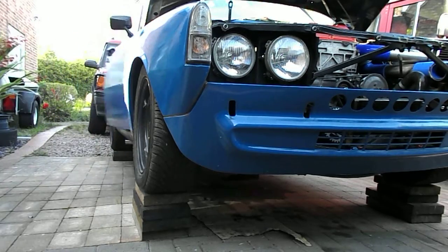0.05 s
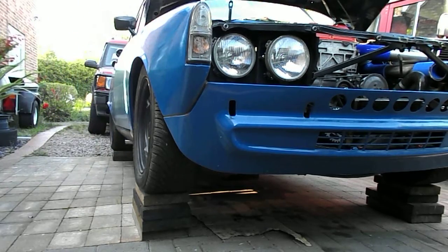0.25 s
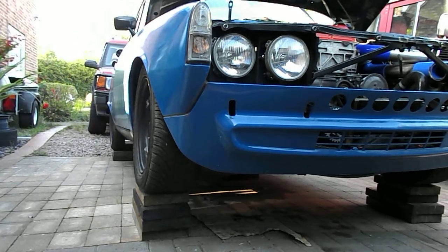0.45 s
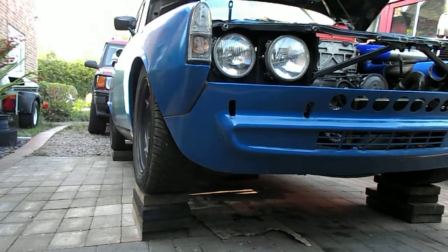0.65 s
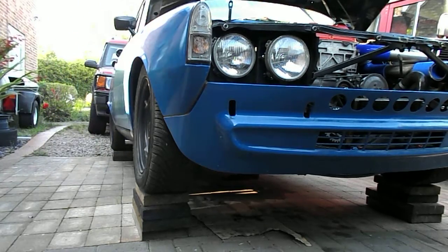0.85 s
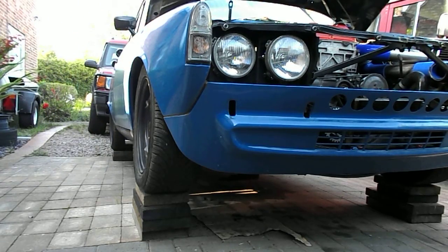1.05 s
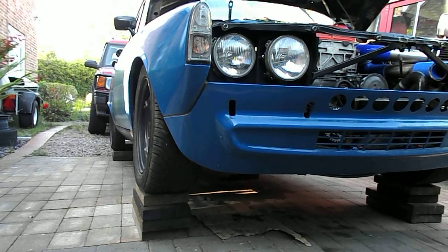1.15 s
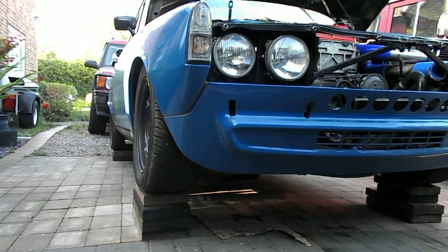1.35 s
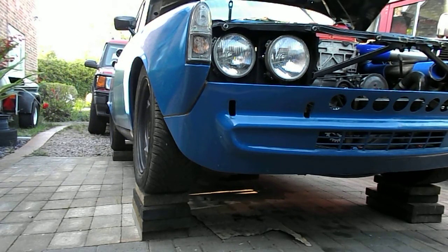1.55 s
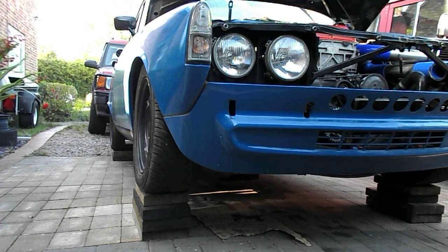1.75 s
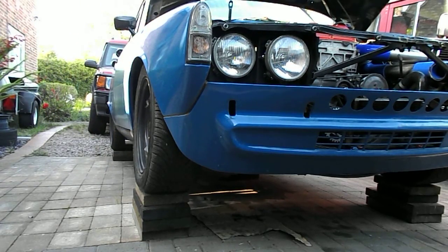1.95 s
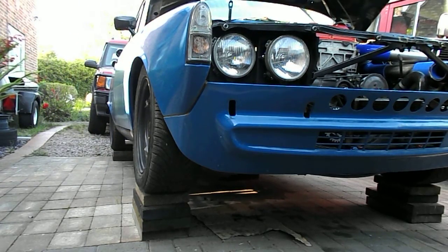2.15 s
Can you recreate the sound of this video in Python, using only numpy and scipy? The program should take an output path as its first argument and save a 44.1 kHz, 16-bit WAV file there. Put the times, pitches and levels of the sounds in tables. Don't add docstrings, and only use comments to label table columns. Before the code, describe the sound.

A car door slams shut outdoors. Soft air hiss and a low distant engine drone come first; at about 0.2 s the latch clicks, then at 0.27 s a hard steel clack and hollow panel thump, dying quickly with a short yard echo. A tiny rattle follows at 0.4 s, dull knocks around 0.6, 0.8 and 1.2-1.3 s, and light scuffing ticks near 1.85 s, while the drone sinks in pitch. Dull treble.

```python
import sys
import numpy as np
from scipy import signal
from scipy.fft import rfft, irfft
from scipy.io import wavfile
from scipy.ndimage import uniform_filter1d

SR = 44100
rng = np.random.default_rng(int(sys.argv[2]) if len(sys.argv) > 2 else 0)


def boost_factor(decibels):
    exponent = np.asarray(decibels, float) / 20
    return 10 ** exponent


def wav_out(sig):
    wavfile.write(sys.argv[1], SR, np.round(np.clip(np.atleast_2d(sig).T, -1, 1) * 32767).astype(np.int16))


N = 97020


def read(points, hz):
    f, value = np.transpose(points)
    return np.interp(np.log(hz + 1), np.log(f + 1), value)


def unit_rms(x):
    return x / np.sqrt(np.mean(x ** 2) + 1e-20)


def colour(x, db_at):
    hz = np.fft.rfftfreq(2 * len(x), 1 / SR)
    return irfft(rfft(x, 2 * len(x)) * boost_factor(db_at(hz)))[:len(x)]


def add(mix, start_s, sound):
    part = mix[round(start_s * SR):][:len(sound)]
    part += sound[:len(part)]


def ring(modes, t):
    return sum(boost_factor(db - 60 * t / t60) * np.sin(2 * np.pi * hz * t) for hz, db, t60 in modes)


# pitch_hz, level_db (per Hz)
AIR_SPECTRUM = [(20, -15), (40, -10), (70, -8.5), (120, -8.5), (165, -5.5), (400, -17.5), (1000, -19.5),
                (2000, -25.5), (3800, -27.5), (12000, -38.5)]
# time_s, level_db
AIR_SWELL = [(0, 1.5), (.2, 0.3), (.5, 0), (1.2, 0.47), (1.8, 0), (2.2, -0.1)]


def air():
    level_db, patch_db = -47.5, 1
    frames, hz = N // 256 + 5, np.fft.rfftfreq(1024, 1 / SR)
    real, imaginary, patches = rng.standard_normal((frames, 513, 3)).T
    patches = uniform_filter1d(patches, size=14, axis=0)
    patches = unit_rms(uniform_filter1d(patches, size=10, axis=1))
    spectrum = (real + 1j * imaginary) * boost_factor(read(AIR_SPECTRUM, hz)[:, None] + patch_db * patches)
    hiss = unit_rms(signal.istft(spectrum, nperseg=1024, noverlap=768)[1][:N])
    swell_db = np.interp(np.arange(N) / SR, *np.transpose(AIR_SWELL))
    return boost_factor(level_db + swell_db) * hiss


# time_s, firing_hz, first_order_db, second_order_db, third_order_db
ENGINE = [(0, 87.8, -47, -49.5, -60), (.15, 87.9, -47, -46, -54), (.45, 88, -62, -61.5, -64.5),
          (0.648, 87.47, -54, -48.5, -56.5), (.95, 87.82, -45.5, -54, -59),
          (1.151, 85.65, -46.5, -54.5, -57), (1.33, 83.77, -40, -52, -55.5),
          (1.499, 82.56, -50, -47.5, -62.5), (1.721, 79.8, -55, -46.5, -59.5), (1.9, 77.5, -45.5, -51, -56),
          (2.05, 76.36, -47.5, -52, -57.5), (2.2, 76.2, -54, -49.5, -49)]
# time_s, pitch_hz, level_db
HUM = [(0, 59.3, -52), (.6, 60.87, -57), (1.2, 63.8, -56), (1.8, 63.5, -50.5), (2.2, 60.9, -56)]


def drone():
    waver = 0.011
    t = np.arange(N) / SR
    time_s, firing_hz, *orders_db = np.transpose(ENGINE)
    slow = uniform_filter1d(rng.standard_normal(N), size=2000)
    slow = unit_rms(uniform_filter1d(slow, size=2000))
    turns = np.cumsum(np.interp(t, time_s, firing_hz) * (1 + waver * slow)) / SR
    engine = sum(boost_factor(np.interp(t, time_s, db)) * np.sin(2 * np.pi * (k + 1) * turns + k)
                 for k, db in enumerate(orders_db))
    time_s, pitch_hz, level_db = np.transpose(HUM)
    hum_turns = np.cumsum(np.interp(t, time_s, pitch_hz)) / SR
    hum = boost_factor(np.interp(t, time_s, level_db)) * np.sin(2 * np.pi * hum_turns)
    return np.sqrt(2) * (engine + hum)


SCUFF_STARTS = [.3935, .64, .864, .872, .9, 1.77, 1.8, 1.84, 1.8412, 1.853, 1.858, 1.874, 1.887, 1.893]
# length_s, level_db, centre_hz, width_hz
SCUFF_SHAPES = [(0.02, -45, 2800, 760), (0.038, -55, 3300, 2600), (0.02, -48.5, 3340, 1800),
                (.04, -51, 3000, 1700), (0.011, -46.5, 1060, 1300), (0.18, -52.5, 2900, 4500),
                (0.2, -53.5, 820, 720), (0.17, -51.5, 2800, 1800), (0.0062, -38.5, 5240, 4900),
                (0.0049, -39.5, 6300, 2100), (0.015, -41, 4200, 5200), (0.0077, -40.5, 4200, 4000),
                (.006, -41, 4300, 5000), (0.0065, -42, 2400, 4700)]


def scuffs():
    out, t = np.zeros(N), np.arange(7000) / SR
    for start_s, (length_s, level_db, centre_hz, width_hz) in zip(SCUFF_STARTS, SCUFF_SHAPES):
        def resonance_db(f):
            peak = -10 * np.log10(1 + ((f - centre_hz) / width_hz * 2) ** 2)
            return peak - 10 * np.log10(1 + (.5 * centre_hz / (f + 1)) ** 6)
        grain_db = 2.4 * np.minimum(rng.exponential(1, len(t)), 4)
        grit = unit_rms(colour(rng.standard_normal(len(t)) * boost_factor(grain_db), resonance_db))
        stroke = np.sin(np.pi * np.minimum(t / length_s, 1) ** .5)
        add(out, start_s, boost_factor(level_db) * grit * stroke)
    return out


# start_s, level_db, pitch_hz, t60_s, snap (relative size, negative pulls inward)
KNOCKS = [(.1905, -35.5, 504, 0.016, 1.1), (.2215, -35.5, 1080, 0.19, .1), (.2360, -26, 5210, 0.021, 0.8),
          (.2645, -21, 1178, 0.074, -0.065), (0.2663, -20.5, 3250, 0.02, 0.9),
          (.2670, -22.5, 775, 0.094, .1), (.2755, -27.5, 1507, .04, -0.14), (0.625, -31, 506, 0.024, -1.03),
          (.7670, -33, 443, 0.017, 1.3), (1.1745, -36, 471, 0.059, -1.2),
          (1.1748, -37.5, 763, 0.037, -0.018), (1.1770, -32, 156, 0.071, 0.1),
          (1.1950, -39.5, 375, 0.046, 1.1), (1.2107, -42.5, 2300, 0.0095, 0.16),
          (1.2210, -41.5, 2120, 0.017, 0.43), (1.207, -43, 907, 0.062, 0.6),
          (1.3070, -30.5, 1263, 0.0065, 0.16), (1.3070, -36.5, 426, 0.018, 0.003),
          (1.6850, -45.5, 1530, 0.027, 0.61), (1.8897, -39, 2630, 0.024, -0.29),
          (1.891, -38, 450, 0.027, 0.12), (2.0830, -49, 2530, .02, 0.66)]


def knocks():
    tick_hz = 2300
    out, t = np.zeros(N), np.arange(4000) / SR
    u = 2 * np.pi * tick_hz * t
    pulse = signal.lfilter([.3], [1, -.7], u * (1 - .5 * u) * np.exp(-u))
    for start_s, level_db, hz, t60, snap in KNOCKS:
        modes = [(hz, 0, t60), (1.35 * hz, -3, 0.37 * t60),
                 (.72 * hz, -11, t60), (2.03 * hz, -8, 0.61 * t60)]
        add(out, start_s, np.sign(snap) * boost_factor(level_db) * (7 * abs(snap) * pulse + ring(modes, t)))
    return out


# start_s, level_db,
# pitch_hz, t60_s
PINGS = [(0.2202, -31, 3100, 0.03), (0.2204, -27.5, 4010, 0.03), (.2222, -28, 3500, 0.038),
         (.2260, -33.5, 2300, 0.25), (.2310, -32.5, 811, 0.13), (.2362, -27, 4760, 0.037),
         (.2400, -26, 301, 0.079), (.2410, -30, 4220, 0.026), (0.2655, -18, 11150, 0.01),
         (0.267, -11, 3280, 0.0043), (0.275, -22.5, 1075, 0.057), (.2650, -21.5, 4830, 0.023),
         (.2690, -23, 3610, 0.028), (.2720, -26, 2320, 0.049), (0.2746, -16.5, 4320, 0.02),
         (0.278, -22, 4680, 0.023), (0.2842, -24, 2950, 0.048), (.2850, -24.5, 3674, 0.093),
         (.2880, -27.5, 3264, 0.055), (.2965, -33, 3600, 0.027), (0.306, -42, 2500, 0.039),
         (.3180, -35, 3304, 0.069), (.3220, -23, 137, 0.18), (0.347, -31, 86, 0.13),
         (.3260, -32.5, 643, 0.11), (.3945, -37, 2350, 0.017), (.4000, -35, 3800, 0.014),
         (0.404, -31.5, 3400, .01), (0.41, -45, 3740, 0.064), (0.419, -36.5, 147, 0.19),
         (0.6245, -40, 3240, 0.0093), (.6250, -33.5, 980, 0.021), (.6510, -41, 3500, .008),
         (0.767, -42, 4040, .012), (1.1900, -47.5, 953, .1), (1.2100, -50, 2590, .03),
         (1.3072, -43, 910, 0.025), (1.8425, -40, 5900, 0.0085), (1.841, -38, 3270, .004),
         (1.8444, -34, 1000, 0.016), (1.8613, -42.5, 2150, 0.034), (1.8647, -33, 3640, .006),
         (1.8675, -38, 4530, .02), (1.8759, -37, 4500, .006), (1.887, -34, 9150, .01),
         (1.8880, -33, 7800, .01), (1.8907, -29, 3030, .004), (1.8915, -30, 2250, .012),
         (1.8940, -38, 2860, .025), (1.9075, -48, 3520, .015)]


def pings():
    rise_s = 0.00038
    out, t = np.zeros(N), np.arange(6000) / SR
    for start_s, level_db, pitch_hz, t60_s in PINGS:
        add(out, start_s, np.minimum(t / rise_s, 1) * ring([(pitch_hz, level_db, t60_s)], t))
    return out


# start_s, level_db, bass_db (below 200 Hz)
THUDS = [
    (0.232, -32, -10),
    (0.266, -19, -28),
    (0.2918, -21.5, 1),
    (0.3010, -26.5, 5),
    (0.319, -42.5, 4),
    (.345, -37, -12),
]
# pitch_hz, level_db, t60_s
PANEL_MODES = [(77, -20, 0.17), (113.8, -1.5, 0.12), (135, -21, 0.1), (162, 1, 0.26), (224.5, -10.5, 0.28),
               (311.3, -10, 0.26), (420, -7, 0.089), (535, -13, 0.25), (190.2, -18, 0.18),
               (785, -14, 0.095), (1120, -22, .1), (1137, -10, 0.3)]


def panel():
    push_s, rumble_db, rumble_hz, rumble_t60_s = 0.001, -2.5, 600, 0.19
    out, t = np.zeros(N), np.arange(22000) / SR
    push = np.sin(np.pi * np.minimum(t[:800] / push_s, 1))
    push = push / push.sum()

    def rumble_band_db(f):
        return -10 * np.log10(1 + (f / rumble_hz) ** 4) - 10 * np.log10(1 + (220 / (f + 1)) ** 4)

    for start_s, level_db, bass_db in THUDS:
        uneven_db = .5 * rng.standard_normal(len(PANEL_MODES))
        modes = [(hz, db + extra + bass_db * (hz < 200), t60)
                 for (hz, db, t60), extra in zip(PANEL_MODES, uneven_db)]
        boom = signal.oaconvolve(ring(modes, t), push)[:len(t)]
        rumble = unit_rms(colour(rng.standard_normal(len(t)), rumble_band_db))
        rumble = rumble * np.minimum(t / 0.014, 1) * boost_factor(rumble_db - 60 * t / rumble_t60_s)
        add(out, start_s, -boost_factor(level_db) * (boom + rumble))
    return out


# start_s, level_db, t60_s, tilt_db (per octave)
BLOWS = [
    (0.2197, -27, 0.28, 1.5),
    (0.2361, -25.5, 0.029, -1),
    (.2640, -16.5, 0.059, -1.5),
    (.2700, -22.5, 0.093, -5.5),
    (.2760, -35, 0.28, -4.5),
    (0.2844, -23, 0.078, 0),
    (.2930, -27.5, 0.12, -2.5),
    (0.3959, -42.5, 0.11, -2),
    (.4000, -46, 0.11, 3.5),
]
# pitch_hz, level_db
LATCH_MODES = [(790, -2), (1100, 4.5), (1450, -3.5), (2400, -8), (2900, -3), (3500, -7), (4000, 0.5),
               (4600, -5)]
# pitch_hz, level_db
STEEL = [(120, -14), (300, -21), (800, -18), (1450, 3.5), (3700, 4), (6000, -1), (12000, -10.5)]


def latch():
    ring_t60_s, ring_db, rise_s = .02, -6, .001
    clicks_per_s, spread_db = 7000, 1.8
    out, t = np.zeros(N), np.arange(12000) / SR
    bell = ring([(hz, db, ring_t60_s) for hz, db in LATCH_MODES], t[:4000])
    for start_s, level_db, t60_s, tilt_db in BLOWS:
        def steel_db(f):
            return read(STEEL, f) + tilt_db * np.log2((f + 50) / 2000)
        clicks = (rng.random(len(t)) < clicks_per_s / SR) * rng.standard_normal(len(t))
        clicks = clicks * boost_factor(spread_db * rng.exponential(1, len(t)))
        decay = boost_factor(-60 * t / t60_s) + 0.56 * boost_factor(-60 * t / 0.02)
        shape = np.minimum(t / rise_s, 1) * boost_factor(level_db) * decay
        clatter = unit_rms(colour(clicks + 0.64 * rng.standard_normal(len(t)), steel_db))
        bell_rms = np.sqrt(np.mean(signal.oaconvolve(clicks, bell) ** 2))
        ringing = signal.oaconvolve(shape * clicks, bell)[:len(t)] / bell_rms
        add(out, start_s, shape * clatter + boost_factor(ring_db) * ringing)
    return out


# pitch_hz, t60_s
YARD_DECAY = [(100, 0.31), (500, 0.3), (2000, 0.16), (6000, 0.2)]


def yard(x):
    taps = np.zeros(SR // 2)
    at = np.arange(300, len(taps) - 20, 20)
    taps[at + rng.integers(0, 20, len(at))] = rng.choice([-1., 1.], len(at))
    hz, t, z = signal.stft(taps, SR, nperseg=256)
    dying = z * boost_factor(-60 * t / read(YARD_DECAY, hz)[:, None])
    tail = signal.istft(dying, SR, nperseg=256)[1]
    return signal.fftconvolve(x, tail / np.linalg.norm(tail))[:N]


def scene():
    low_cut_hz, yard_db = 79, -10.5
    door = latch() + panel() + knocks() + pings() + scuffs()
    near = signal.lfilter(*signal.butter(2, low_cut_hz, "high", fs=SR), door)
    return (near + boost_factor(yard_db) * yard(near) + drone() + air())[None]


# pitch_hz, level_db
TREBLE = [(4000, -0.33), (5000, -2), (5800, -3.5), (6600, -10.5), (7700, -12), (9200, -13), (10800, -7),
          (11500, -16.5)]
GAPS_HZ = (7000, 8500, 10000)


def treble_response(x):
    gap_width_hz, edge_hz = 450, 11580

    def response_db(f):
        gaps_db = sum(10 * np.log10(0.0012 + 1 - np.exp(-((f - hz) / gap_width_hz) ** 2))
                      for hz in GAPS_HZ)
        return read(TREBLE, f) + gaps_db - 10 * np.log10(1 + (f / edge_hz) ** 200)
    return colour(x, response_db)


def top_cut(x):
    return signal.sosfilt(signal.butter(12, 12300, fs=SR, output="sos"), x)


def record(dry):
    mix = treble_response(dry[0])[None]
    return top_cut(mix)


dry = scene()
out = record(dry)
wav_out(out)
```